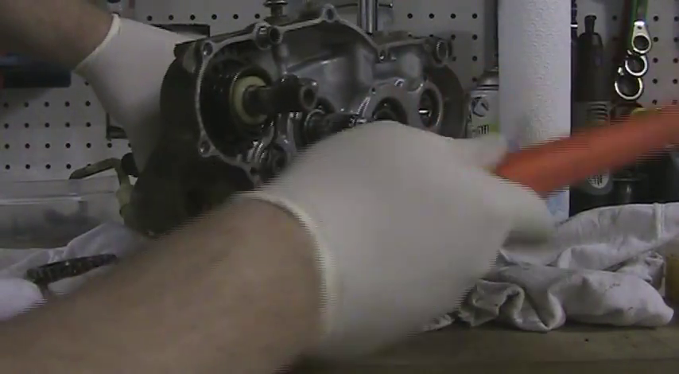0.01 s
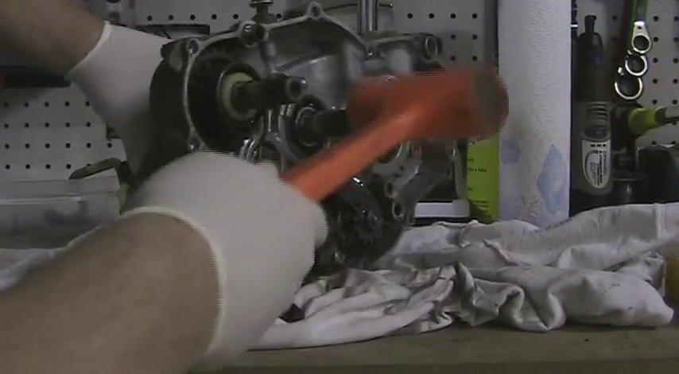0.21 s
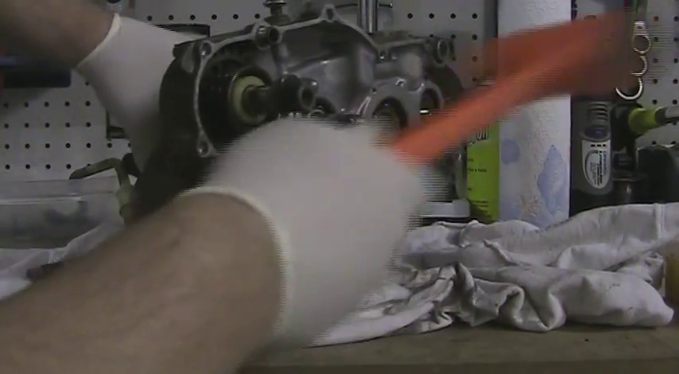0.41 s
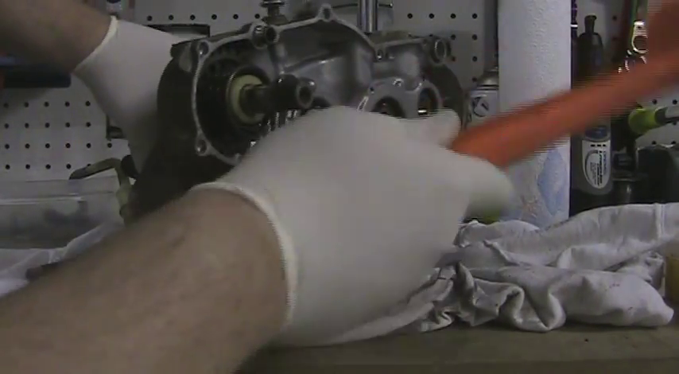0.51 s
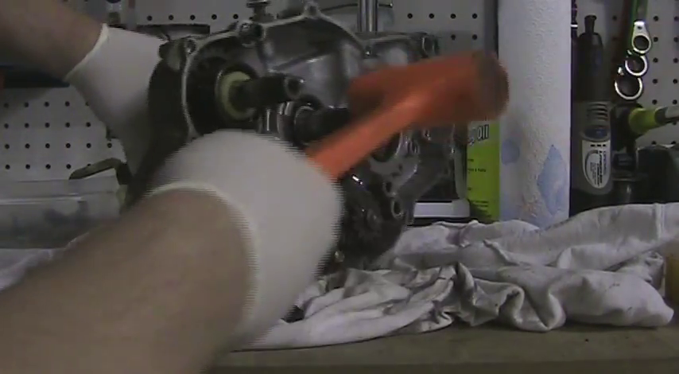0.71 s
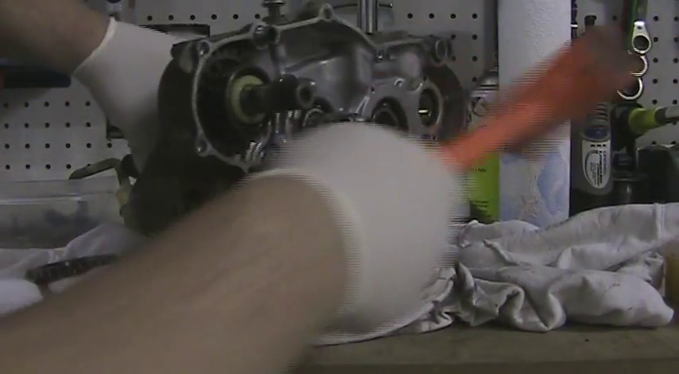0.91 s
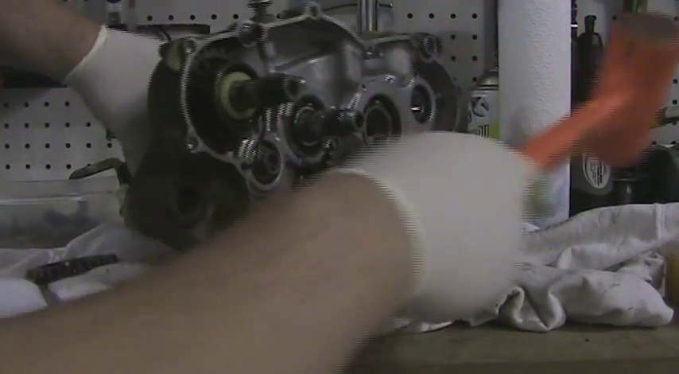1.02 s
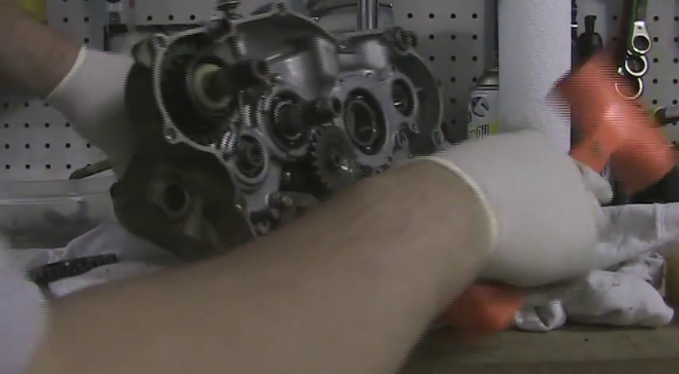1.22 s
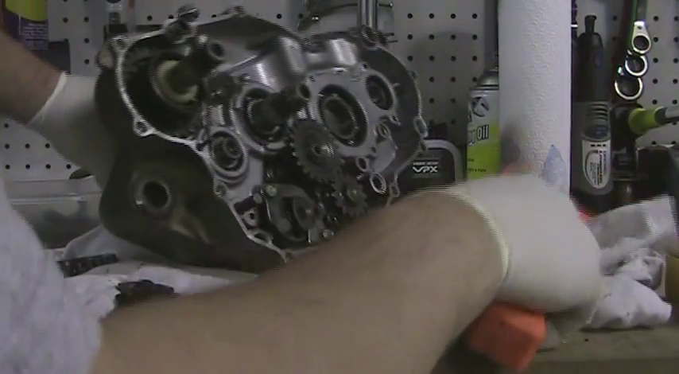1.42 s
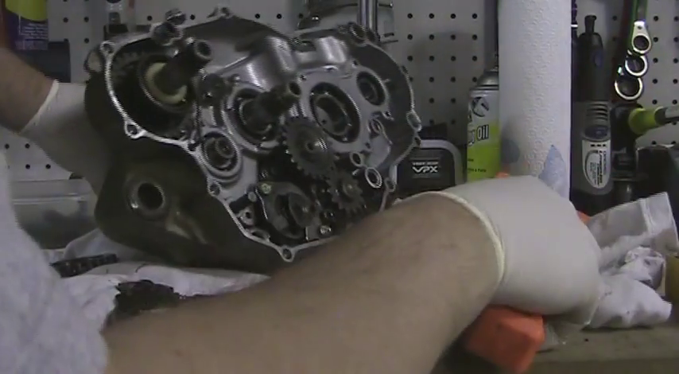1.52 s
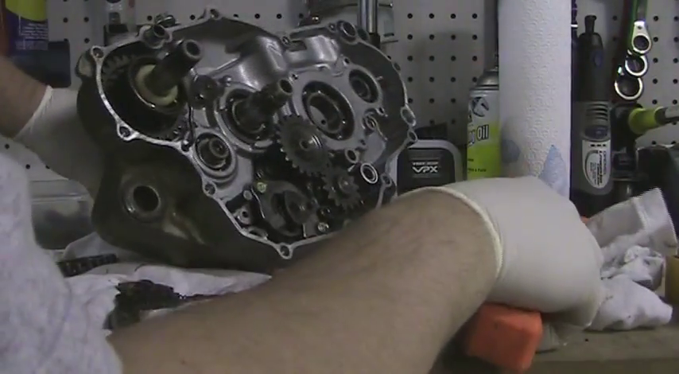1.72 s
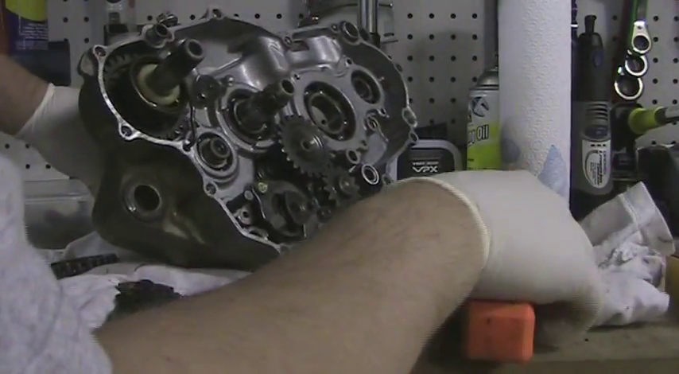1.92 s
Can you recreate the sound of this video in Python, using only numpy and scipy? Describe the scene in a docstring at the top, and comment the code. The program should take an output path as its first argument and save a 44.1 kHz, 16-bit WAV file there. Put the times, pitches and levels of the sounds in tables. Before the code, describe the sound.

A mallet hits a steel shaft in an engine casing twice, sharp, clanking and overloaded at a close microphone, echoing in a hard-walled workshop; then it clatters onto a wooden bench, with glove snaps and a soft bump.

```python
"""In a hard-walled workshop, a mallet drives a steel shaft in an aluminium engine casing, two blows a second.
Each blow is a jolt, fading tones and bursts of noise; it overloads the close microphone and leaves the room
ringing. Sleeve and glove rustle in swells of noise. Then the mallet is put down on the wooden bench with a
thud, the glove crackles in tiny snaps of noise, and a soft bump and a low rub follow.
A noise tail makes the room, over a faint hiss and whine."""
import sys
import numpy as np
from scipy import signal
from scipy.io import wavfile

SR = 44100
rng = np.random.default_rng(int(sys.argv[2]) if len(sys.argv) > 2 else 0)


def transcribe(signal):
    """Save signal, clipped to [-1, 1], as a 16-bit WAV file at the path in sys.argv[1]."""
    frames = np.atleast_2d(signal).T
    limited = np.clip(frames, -1, 1)
    pcm = np.round(limited * 32767).astype(np.int16)
    wavfile.write(sys.argv[1], SR, pcm)


N = 88200
LEAD = SR // 2   # samples of run-in, cut off at the end
TIME = np.arange(-LEAD, N) / SR   # seconds
AGE = np.arange(SR // 3) / SR   # seconds since a contact
DIRECT_SIDE_SHARE = 0.22   # how far close sounds differ between the ears; 1 follows the room's likeness table


def from_db(db):
    """Turn decibels into a gain."""
    return 10 ** (np.asarray(db) / 20)


def fade(t, t60):
    """Die away exponentially, falling by 60 dB in t60 seconds."""
    return np.exp(-np.log(1000) * t / t60)


def sine(hz):
    """A pure tone that starts at the contact."""
    return np.sin(2 * np.pi * hz * AGE)


def low_cut(x, hz, order):
    """Weaken everything below a frequency."""
    return signal.sosfilt(signal.butter(order, hz, "high", fs=SR, output="sos"), x)


def at_hz(rows, hz, axis=1):
    """Read a column of a table at a frequency, between rows on a log-frequency scale."""
    rows = np.array(rows)
    return np.interp(np.log(hz), np.log(rows[:, 0]), rows[:, axis])


def add(track, s, sound):
    """Mix a sound into the track at a time in seconds."""
    i = int(round(s * SR)) + LEAD
    part = sound[..., :track.shape[1] - i]
    track[:, i:i + part.shape[-1]] += part


def coloured(rows, size, side_share, dying=False, unit=True):
    """Stereo noise in half-octave bands; each may die at its own rate. Starts near rms 1 if unit."""
    # How alike the two ears are in the room. Each row: frequency in Hz, left-right likeness from 0 to 1.
    likeness = [(100, 0.46), (300, 0.81), (700, 0.78), (2000, 0.22), (6000, 0.23), (14000, 0.24)]
    edges = 22 * 2 ** np.arange(0, 9.6, .5)   # Hz
    white = rng.standard_normal((2, 2, size))
    t = np.arange(size) / SR
    out, power = 0, 0
    for k, (low, high) in enumerate(zip(edges, edges[1:])):
        band_filter = signal.butter(2, [low, high], "band", fs=SR, output="sos")
        # neighbouring bands use different noise
        mid, side = signal.sosfilt(band_filter, white[k % 2])
        hz = np.sqrt(low * high)
        apart = np.minimum(side_share * (1 - at_hz(likeness, hz)) / 2, .5)
        gain = from_db(at_hz(rows, hz))
        # the side noise has opposite signs in left and right
        band = gain * (np.sqrt(1 - apart) * mid + np.sqrt(apart) * side * [[1], [-1]])
        if dying:
            band = band * fade(t, at_hz(rows, hz, axis=2))
        out = out + band
        power += gain ** 2 * (high - low) / (SR / 2)
    return out / np.sqrt(power) if unit else out


def ring(modes):
    """One blow sets every mode (natural tone) ringing, each with a strength of its own."""
    spread_db = 4.5   # random strength, standard deviation
    chance = rng.standard_normal(len(modes))
    total = 0
    for k, (hz, db, t60) in enumerate(modes):
        strength = (-1) ** k * from_db(db + spread_db * chance[k])   # signs alternate
        total = total + strength * sine(hz) * fade(AGE, t60)
    return total


def shaft_blows():
    """Jolt, ringing casing and bright noise, with early echoes; also returns what goes into the room."""
    # Blows on the shaft; the first falls before the start, so only what is left of it is heard.
    # Each row: start in seconds, level of jolt and ringing in dB, level of crack and contact in dB,
    # off-centre hit from 0 to 1, pitch of the jolt in Hz, level sent to the room in dB.
    blow_rows = [(-.275, -9, 0, 0.61, 783, 4.5), (0.2249, -3.5, 0.5, 0, 815, 2.5),
                 (0.7204, -5.5, -1, 0.85, 720, 1.5)]
    # Ringing tones of shaft and casing. Each row: frequency in Hz, relative level in dB when struck squarely,
    # relative level in dB when struck off-centre, t60 in seconds.
    casing = [(332, -19.5, -15.5, 0.082), (400, -11, -17, 0.074), (518.6, -28.5, -15.5, 0.017),
              (560, -14, -20, 0.14), (644, -5, -8, 0.021), (853, -13.5, -18.5, 0.084), (926, -24, -6, 0.02),
              (1195, -21.5, -24, 0.13), (1354, -10.5, -21.5, 0.031), (1563, -11.5, -1, 0.045),
              (1657, -20, -16.5, 0.12), (1754, -9.5, -14.5, 0.067), (1916, -14.5, -15, 0.064),
              (2000, -21, -26, 0.13), (2787, -25.5, -12.5, 0.098), (3092, -19, -4, 0.038),
              (3786, -14, -19.5, 0.069), (4100, -22.5, -31, 0.049), (4950, -24.5, -14.5, 0.028)]
    # Dense high tones of the casing, as noise. Each row: frequency in Hz, relative level in dB per Hz,
    # t60 in seconds.
    crack_bands = [(60, -35, 0.24), (220, -2.5, 0.035), (600, 4, 0.07), (1490, -6, 0.047),
                   (2400, 0.5, 0.038), (4130, -10, 0.093), (7500, -2.5, 0.054), (10170, -13.5, 0.054),
                   (14200, -33, 0.02)]
    # The sharp snap of the contact itself. Each row: frequency in Hz, relative level in dB per Hz.
    contact_bands = [(100, -14.5), (1000, 2), (3500, -4), (8000, -15), (15000, -23)]
    # Echoes from bench and tool board. Each row: delay in seconds, level in dB.
    wall_echoes = [(.0078, -22.5), (0.0123, -21.5)]
    out, to_room = np.zeros((2, 2, len(TIME)))
    # each blow also thumps the bench below the casing
    shake = from_db(-23.5) * sine(148) * fade(AGE, 0.16)
    for s, db, crack_db, off_centre, jolt_hz, room_db in blow_rows:
        struck = [(hz, square_db + off_centre * (off_db - square_db), t60)
                  for hz, square_db, off_db, t60 in casing]
        modes = ring(struck)
        jolt = from_db(13) * sine(jolt_hz) * fade(AGE, .010)   # the whole casing jolts at contact
        # the casing is too small to radiate bass
        body = from_db(db) * (low_cut(jolt + modes, 292, order=2) + shake)
        crack = from_db(-6) * coloured(crack_bands, len(AGE), DIRECT_SIDE_SHARE, dying=True)
        contact = from_db(2) * coloured(contact_bands, len(AGE), DIRECT_SIDE_SHARE) * fade(AGE, 0.018)
        blow = body + from_db(crack_db) * (contact + crack)
        add(out, s, blow)
        for delay, echo_db in wall_echoes:
            add(out, s + delay, from_db(echo_db) * blow)
        impact = from_db(26) * (AGE == 0)   # a one-sample click that excites all pitches of the room
        ringing = from_db(-11) * (modes + shake)
        add(to_room, s, from_db(room_db) * (impact + ringing))
    return out, to_room


def bench_knocks():
    """The mallet lands, bounces and settles, ringing the bench; also returns what goes into the room."""
    # Knocks on the bench; a low cut-off makes a dull contact. Each row: start in seconds, level in dB,
    # contact cut-off in Hz, level of the clatter in dB.
    knock_rows = [(1.5198, -5.5, 300, -20.5), (1.5239, 3.5, 2000, 2.5), (1.5284, -2.5, 3100, -0.5),
                  (1.5373, -10.5, 3020, -2), (1.564, -12, 450, -35), (1.655, -22.5, 400, -36),
                  (1.927, -19, 127, -43), (1.938, -25, 900, -22.5)]
    # Ringing tones of bench and mallet. Each row: frequency in Hz, relative level in dB, t60 in seconds.
    bench = [(106, -28.5, 0.16), (157, -24, 0.24), (203, -17.5, 0.04), (282.5, -17, 0.06),
             (310.7, -16.5, 0.1), (363, -13, 0.042), (708, -26, .05), (887, -26, 0.04), (1230, -28, 0.085),
             (1547, -25, 0.066), (2952, -22.5, 0.032), (4380, -25, 0.016)]
    # Loose parts clatter with each knock. Each row: frequency in Hz, relative level in dB per Hz,
    # t60 in seconds.
    clatter_bands = [(101, -39, 0.036), (400, 12.5, 0.063), (1120, -0.5, 0.064), (2110, -12, 0.18),
                     (4240, -18, 0.15), (6900, -25.5, 0.053), (13800, -76, 0.031)]
    out, to_room = np.zeros((2, 2, len(TIME)))
    # the broad, dull impact in the room: a click with its treble softened
    click = (AGE == 0) + 1e-18   # the tiny offset keeps the filter away from zero
    dull = signal.butter(1, 300, fs=SR, output="sos")
    impact = from_db(24) * signal.sosfilt(dull, click)
    for s, db, soft_hz, clatter_db in knock_rows:
        soft = signal.butter(2, soft_hz, fs=SR, output="sos")
        clatter_noise = coloured(clatter_bands, len(AGE), DIRECT_SIDE_SHARE, dying=True)
        clatter = from_db(clatter_db - 19) * clatter_noise
        knock = from_db(db) * signal.sosfilt(soft, ring(bench)) + clatter
        add(out, s, knock)
        add(to_room, s, from_db(-6) * knock + from_db(db) * signal.sosfilt(soft, impact))
    return out, to_room


def drag():
    """A low, dull rub of noise as the mallet shifts on the wood; it rises quickly and then holds."""
    # Colour of the rub. Each row: frequency in Hz, relative level in dB per Hz.
    rub_bands = [(50, -22), (110, -7), (150, 0), (220, -14), (400, -12), (900, -16), (1600, -25),
                 (4000, -36), (14000, -48)]
    start_s, rise_s = 1.926, .012
    rise = np.clip((TIME - start_s) / rise_s, 0, 1)
    return from_db(-43.5) * rise * coloured(rub_bands, len(TIME), side_share=0.58)


def hand():
    """Sleeve and glove rustle in swells of noise, and the rubber glove snaps in tiny bursts."""
    # Rustles of sleeve and glove. Each row: time of the peak in seconds, level in dB, width in seconds.
    rustles = [(.13, -61, 0.031), (.15, -46, 0.011), (.63, -67, 0.011), (0.649, -45.5, 0.014),
               (1.01, -61.5, .012), (1.046, -52.5, 0.01), (1.17, -64, 0.048), (1.267, -63, 0.0067),
               (1.323, -60, 0.01), (1.795, -54.5, 0.0052), (1.836, -63, 0.0087), (1.86, -56.5, 0.025),
               (1.879, -61, 0.0037), (1.896, -55, 0.0046), (1.918, -56, 0.006)]
    # Colour of the rustle. Each row: frequency in Hz, relative level in dB per Hz.
    rustle_bands = [(500, -11), (1500, -2.5), (3500, 3), (8000, 3), (12000, 0.5), (16000, -16.5)]
    # Snaps of the glove. Each row: start in seconds, level in dB, centre frequency in Hz.
    snaps = [(1.32, -33.5, 9000), (1.8308, -19, 9800), (1.836, -24, 9900), (1.8405, -42, 12000),
             (1.8802, -33, 7500), (1.8911, -29, 7500)]
    swell = sum(from_db(db) * np.exp(-.5 * ((TIME - s) / width) ** 2) for s, db, width in rustles)
    out = swell * coloured(rustle_bands, len(TIME), side_share=0.24)
    edge_ratio = 1.24   # band edge to centre
    for s, db, hz in snaps:
        band = signal.butter(2, [hz / edge_ratio, hz * edge_ratio], "band", fs=SR, output="sos")
        burst = rng.standard_normal(len(AGE)) * fade(AGE, 0.0036)
        add(out, s, from_db(db) * signal.sosfilt(band, burst))
    return out


def workshop(sound):
    """Hard walls answer with a diffuse noise tail that builds up quickly and fades at its own rate per band."""
    # The room's reverberation. Each row: frequency in Hz, relative level in dB, t60 in seconds.
    reverb_bands = [(60, -6, 0.5), (152, -3, 0.68), (300, 4.5, 0.57), (600, 2, 0.88), (1178, 1.5, 0.86),
                    (1900, -4.5, 0.85), (2500, -6.5, 0.87), (4063, -7.5, 0.76), (7300, -7.5, 0.46),
                    (9000, -7, 0.17), (12300, -30.5, 0.17), (15000, -32, .35)]
    size = SR * 3 // 2
    build_s = 0.04
    build = 1 - np.exp(-np.arange(size) / SR / build_s)
    noise = coloured(reverb_bands, size, side_share=0.38, dying=True, unit=False)
    tail = noise * build * np.sqrt(2 * np.log(1000) / SR)
    mono = sound.mean(axis=0)[None]
    return signal.fftconvolve(mono, tail, axes=1)[:, :len(TIME)]


def background():
    """A steady hiss of coloured noise and a faint electrical whine, a pure tone."""
    # Colour of the hiss. Each row: frequency in Hz, relative level in dB per Hz.
    hiss_bands = [(25, -3.5), (60, 1.5), (150, -1), (500, -4.5), (1200, -11.5), (3000, -11), (8000, -21),
                  (15000, -29)]
    hiss = from_db(-53.5) * coloured(hiss_bands, len(TIME), side_share=1.9)
    whine = from_db(-77) * np.sin(2 * np.pi * 15734 * TIME)
    return hiss + whine


def scene():
    """Blows, knocks, rub and hand, with the room's answer, over the background."""
    blows, blows_to_room = shaft_blows()
    knocks, knocks_to_room = bench_knocks()
    rustle = hand()
    room = workshop(blows_to_room + knocks_to_room + from_db(5.5) * rustle)
    return (blows + knocks + drag() + rustle + room + background())[:, LEAD:]


def record(dry):
    """The two microphones lose bass unequally, loud peaks are squashed towards a ceiling, the top is cut."""
    low_cut_hz = (32, 61)   # left, right
    ceiling = .95
    thin = np.array([low_cut(channel, hz, order=1) for channel, hz in zip(dry, low_cut_hz)])
    clipped = thin / (1 + (thin / ceiling) ** 6) ** (1 / 6)
    top_cut = signal.ellip(10, .1, 70, 16000, fs=SR, output="sos")   # steep, at 16000 Hz
    return signal.sosfilt(top_cut, clipped)


dry = scene()
out = record(dry)
transcribe(out)
```